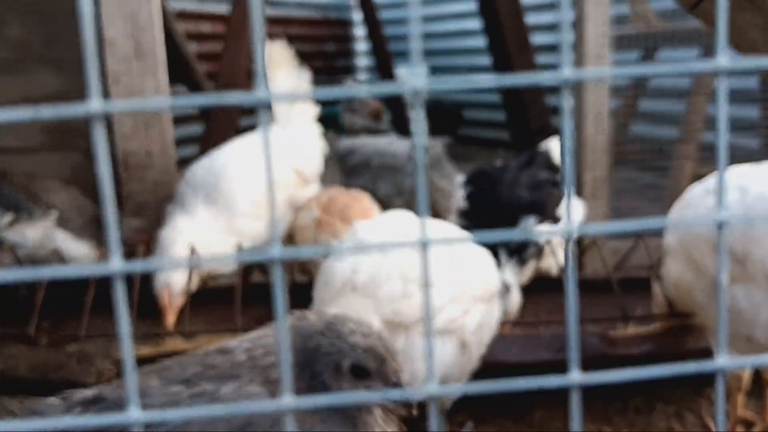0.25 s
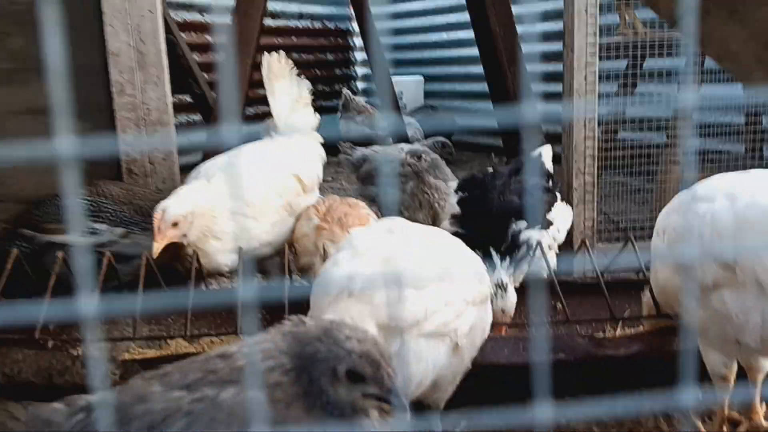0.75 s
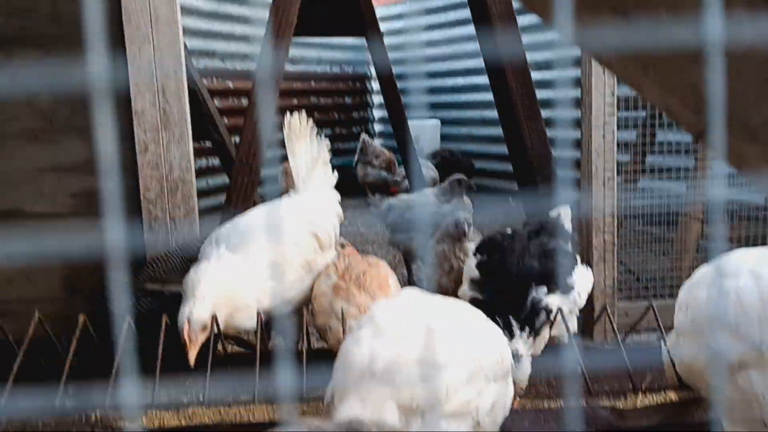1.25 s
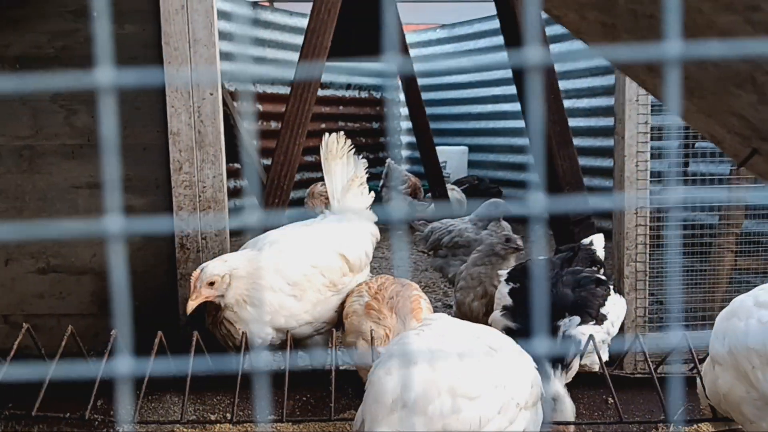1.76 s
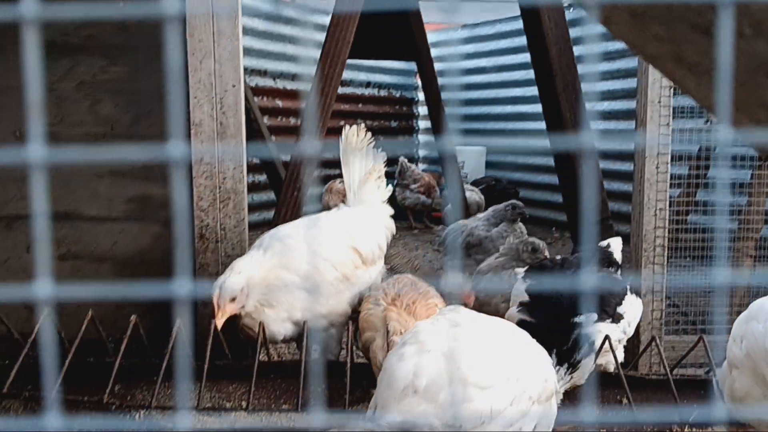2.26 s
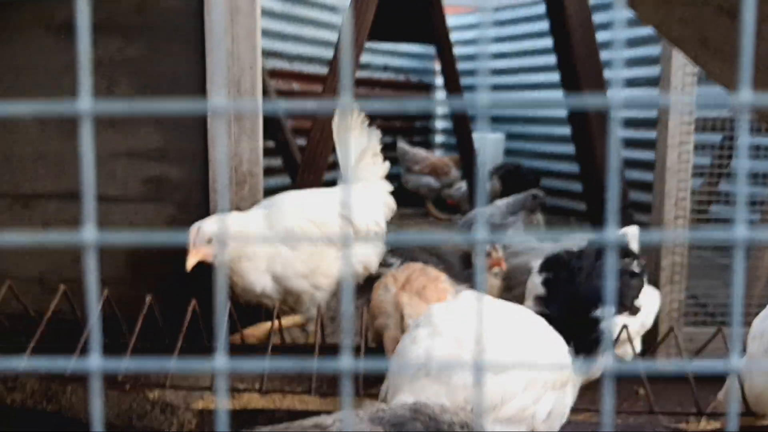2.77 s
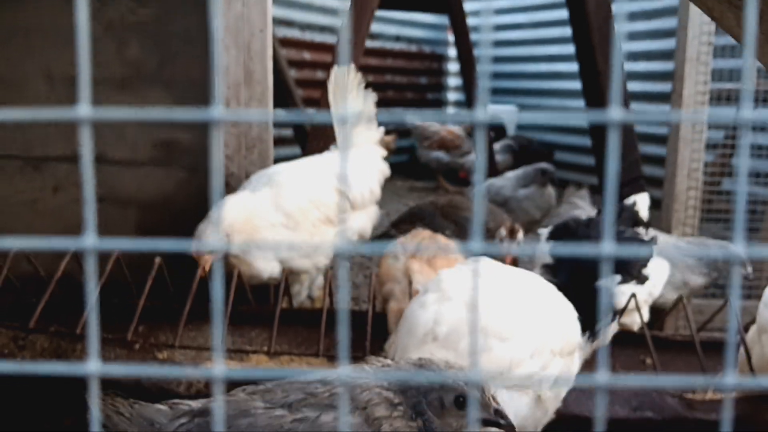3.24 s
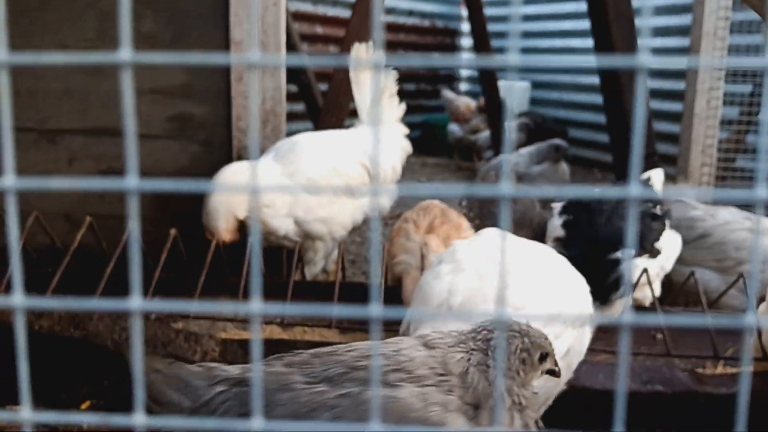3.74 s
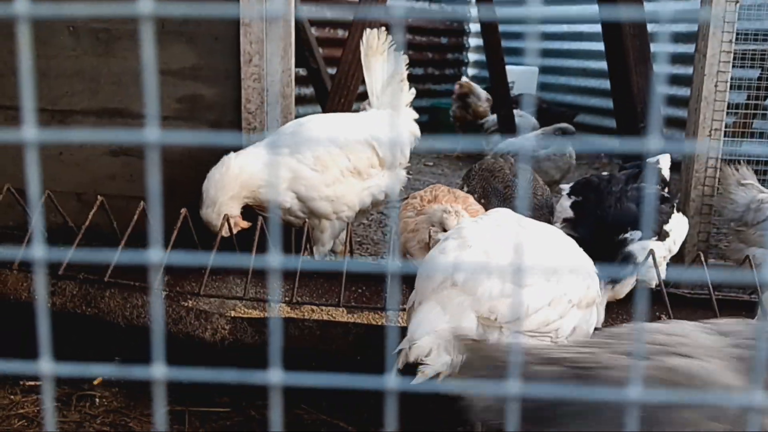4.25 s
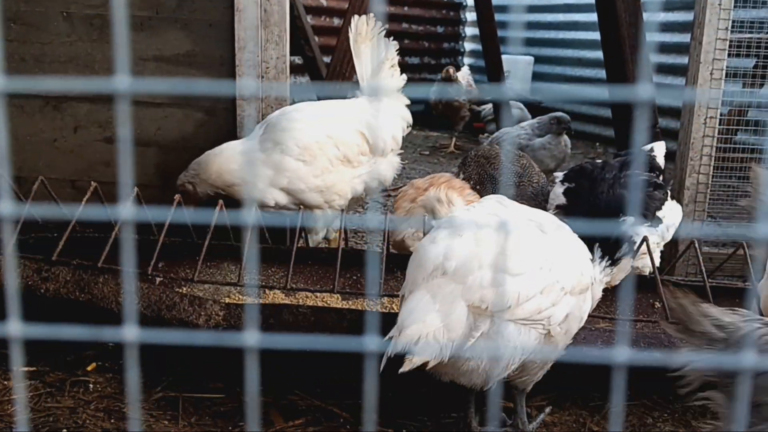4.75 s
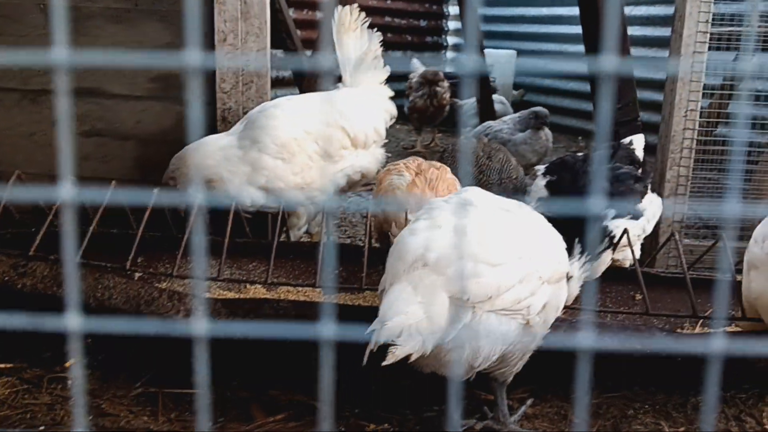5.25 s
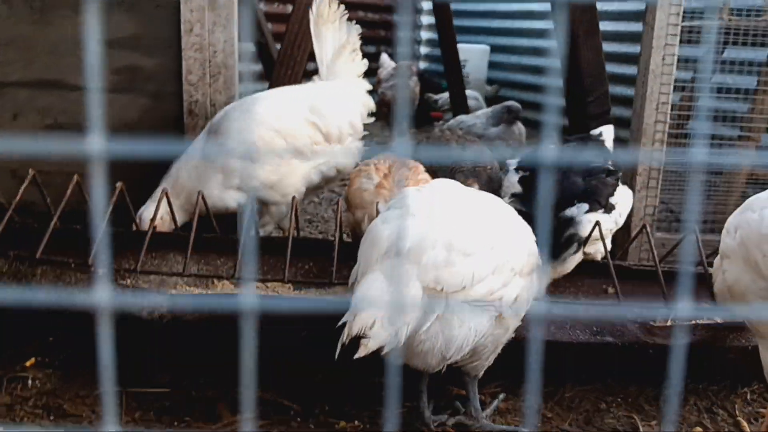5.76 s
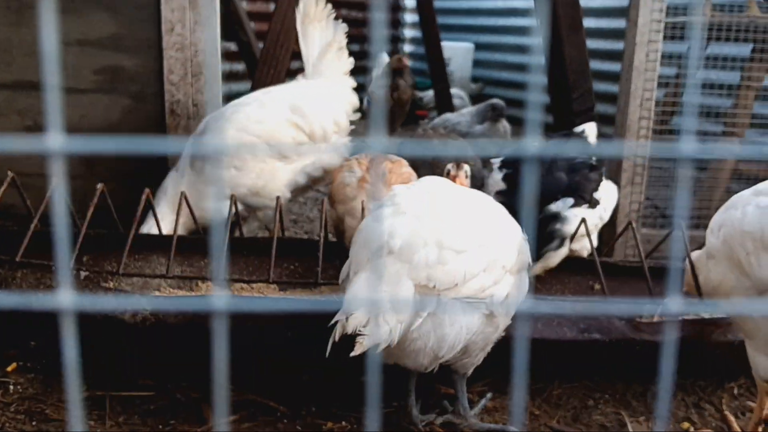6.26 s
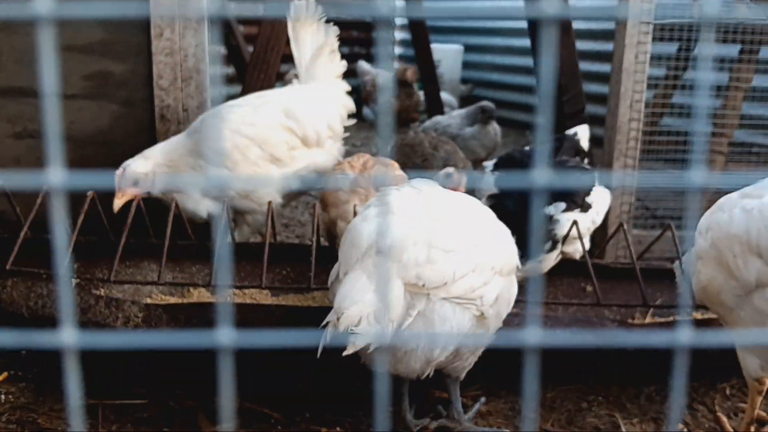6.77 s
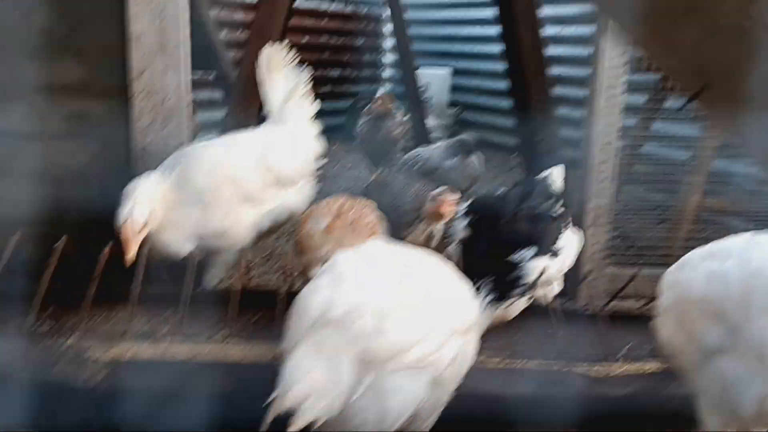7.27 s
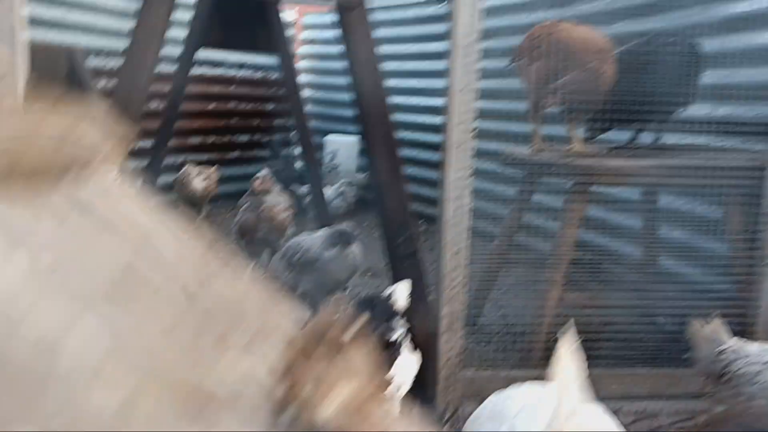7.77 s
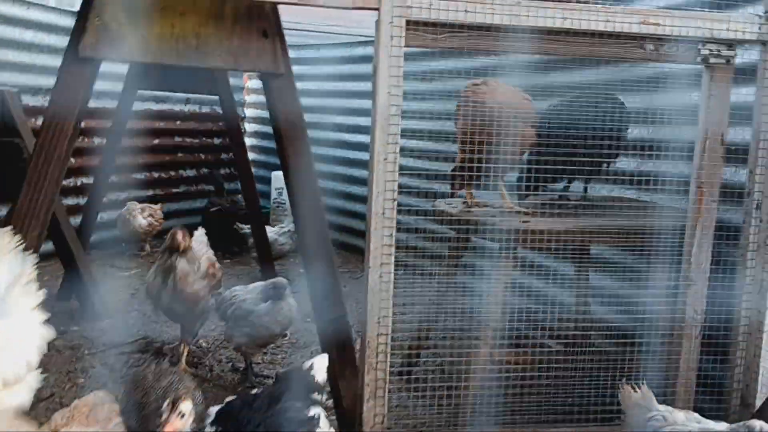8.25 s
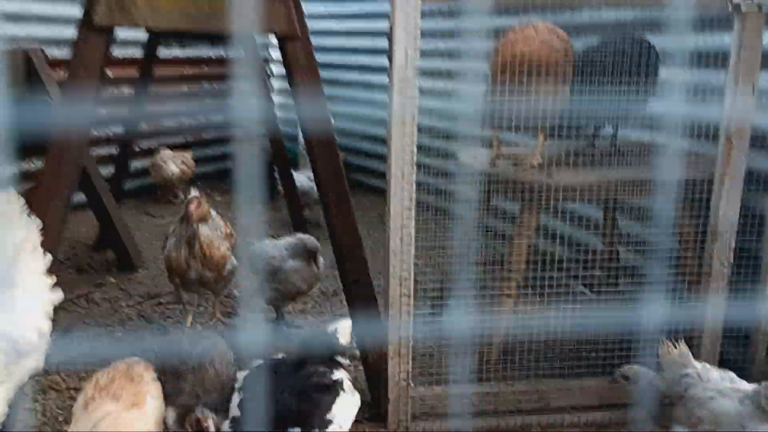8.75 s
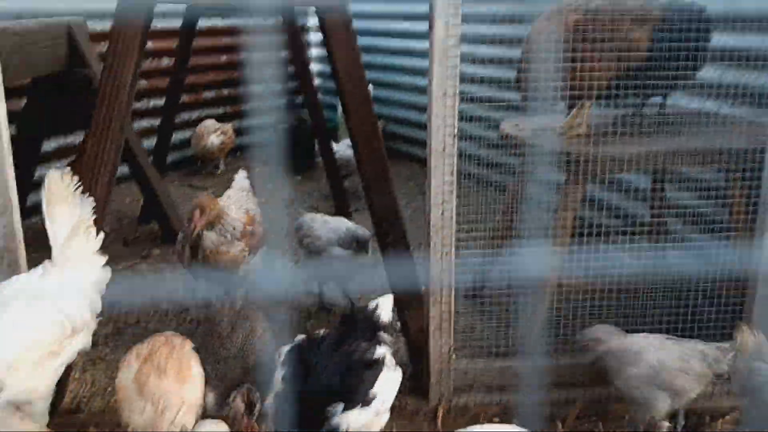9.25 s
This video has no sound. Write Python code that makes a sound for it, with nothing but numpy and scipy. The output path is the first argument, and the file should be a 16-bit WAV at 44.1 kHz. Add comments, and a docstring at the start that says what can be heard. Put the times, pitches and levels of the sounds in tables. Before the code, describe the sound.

Young hens peep and cluck in short, scattered notes throughout, close by in an outdoor run whose metal walls add a brief echo. A faint low rumble, hiss and distant engine drone lie beneath, with occasional soft rustles of feathers and straw. Two sparrows chirp on and off, clearest at about 2, 3 and 5.7 seconds. A quick run of raspy notes comes around 3.5 seconds. From 4 seconds, beaks tick lightly in grain, with knocks on the trough just after 5 seconds and again near 8.3. One hen gives a short, rough croak at about 5.5 seconds. Light wind starts touching the microphone near 6 seconds, then buffets it, mostly on the left, with low thumps between 7.5 and 8 seconds, the loudest moment. Peeps, clucks and further gusts continue until about 9.5 seconds.

```python
"""In a run of wire and corrugated sheet, young hens feed at a trough. The syrinx gives their peeps and
clucks, pulses in a resonant throat a croak. Beaks and feet ring the trough's modes, tick in the grain
and stir the straw; short raspy notes chatter. Two sparrows chirp nearby; the sheet walls reverberate.
Wind buffets the two microphone ports; a far rumble, an engine drone and a hiss lie below."""
import sys
import numpy as np
from scipy import signal
from scipy.fft import rfft, irfft
from scipy.io import wavfile

SR = 44100
rng = np.random.default_rng(int(sys.argv[2]) if len(sys.argv) > 2 else 0)


def pcm_store(signal):
    """Save signal as 16-bit PCM."""
    levels = np.round(np.clip(np.atleast_2d(signal), -1, 1) * 32767)
    wavfile.write(sys.argv[1], SR, levels.astype(np.int16).T)


N = 419391
LEFT_LAG_MS = .92   # mean delay of the left port behind the right


def amp(db):
    return 10 ** (np.asarray(db, float) / 20)


def unit_rms(x):
    return x / np.sqrt(np.mean(x ** 2, axis=-1, keepdims=True) + 1e-20)


def band(x, low_hz, high_hz, order=2):
    sos = signal.butter(order, [low_hz, min(high_hz, 19000)], "band", fs=SR, output="sos")
    return signal.sosfilt(sos, x)


def curves(rows):
    """Linear interpolation: each column after the time becomes one value a sample."""
    times, *columns = np.transpose(rows)
    return [np.interp(np.arange(N) / SR, times, column) for column in columns]


def coloured(x, points):
    """Spectral shaping by (Hz, dB) points, scaled to unit rms."""
    hz, level_db = np.transpose(points)
    bin_hz = np.maximum(np.arange(N // 2 + 1) * SR / N, 1)
    gain = amp(np.interp(np.log(bin_hz), np.log(hz), level_db))
    return unit_rms(irfft(rfft(x) * gain, N))


def wobble(size, per_s):
    """Random modulation: Gaussian points joined by lines."""
    points = rng.standard_normal(size // 20 + 3)
    return np.interp(np.arange(size) * min(per_s, 2000) / SR, np.arange(len(points)), points)


def swell(size, skew):
    """A rounded envelope; a skew below 1 makes the attack faster than the decay."""
    return np.sin(np.pi * np.linspace(0, 1, size) ** skew) ** 0.67


def grains(size):
    """A random impulse process: dense clicks of uneven size, in clumps."""
    clicks = rng.standard_normal(size) * amp(1.5 * np.minimum(rng.exponential(1, size), 5))
    return clicks * (rng.random(size) < .15) * amp(8.4 * wobble(size, 64))


def place(bus, start, x, pan_db, echo_db):
    """Level and time differences give direction. Pan is left minus right; rows are left, right, echo."""
    lag_s = (LEFT_LAG_MS + .2 * rng.standard_normal()) / 1000
    for row, delay, gain_db in ((0, lag_s, min(pan_db, 0)), (1, 0, -max(pan_db, 0)), (2, 0, echo_db)):
        at = round((start + delay) * SR)
        bus[row, at:at + len(x)] += amp(gain_db) * x[:N - at]


def ambience():
    """Far rumble and hiss, weakly coherent between the ports; the flock's stirring flickers on top."""
    # The background spectrum. Each row: frequency in Hz, relative density in dB.
    spectrum = [(18, -102), (30, -8.5), (59, 0), (88, -1), (467, -19.5), (921, -24.5), (3230, -28),
                (5040, -30.5), (10200, -32), (11900, -40), (15500, -42.5)]
    coherence = 0.05
    noise = coloured(rng.standard_normal((3, N)), spectrum)
    common = np.array([np.roll(noise[0], round(LEFT_LAG_MS * SR / 1000)), noise[0]])
    bed = np.sqrt(coherence) * common + np.sqrt(1 - coherence) * noise[1:]
    flicker = amp(-77.5 + 5.7 * wobble(N, 21))
    stirring = unit_rms(band(np.array([grains(N), grains(N)]), 7150, 8710))
    return amp(-63) * bed + flicker * stirring * amp([[0], [-6]])


def whine():
    """Random frequency modulation widens a thin, slowly sagging tone, mostly at the right port."""
    sag_hz_per_s, width_hz = 7.5, 18
    hz = 10385 - sag_hz_per_s * np.arange(N) / SR + width_hz * (wobble(N, 68) + wobble(N, 1.5))
    tone = np.sin(np.cumsum(hz) * 2 * np.pi / SR)
    return tone * amp(-76 + 3.5 * wobble(N, 30)) * amp([[-24], [0]])


def engine_drone():
    """Narrow-band noise: a far engine swells and fades, alike at both ports."""
    # The drone's envelope. Each row: time in seconds, level in dB.
    envelope = [(0.0, -83), (0.12, -59.5), (0.51, -74), (0.62, -50), (0.89, -81), (1.57, -89),
                (1.58, -63.5), (3.85, -77.5), (4.74, -53), (4.9, -69), (5.74, -62), (6.4, -87)]
    centre_hz, half_width_hz = 75.7, 6.2
    db, = curves(envelope)
    hum = band(rng.standard_normal(N), centre_hz - half_width_hz, centre_hz + half_width_hz)
    return amp(db) * unit_rms(hum)


def wind():
    """Turbulence gives each port its own low noise: unsteady when light, brighter in strong gusts."""
    # Wind on the ports. Each row: time in seconds, level in dB, pan in dB.
    gusts = [(0.0, -66.5, 14), (2.19, -80.5, 3), (3.33, -76, 2), (4.81, -68, 7), (5.37, -63, 12),
             (5.58, -67, -14), (5.66, -46, 36), (5.74, -75, 7), (5.87, -49, 20.0), (5.95, -68, 4),
             (6.48, -74, -2), (6.54, -47, 15), (6.72, -45.5, 35), (6.8, -58.5, 1), (6.88, -52.5, 2.5),
             (7.41, -45, 19), (7.49, -37, 3), (7.54, -52, 3), (7.59, -35.5, 32), (7.64, -31, 28),
             (7.75, -39, 12), (7.88, -33.5, 39), (8.04, -42.5, 22.5), (8.07, -34, 41), (8.15, -43.5, -16),
             (8.23, -49.5, -32), (8.39, -40.5, 5), (8.44, -48, -20), (8.89, -60.5, -6), (9.13, -35.5, 22),
             (9.18, -53, 18), (9.23, -41.5, 36), (9.31, -56.5, 23), (9.39, -35.5, 42.5), (9.45, -48.5, 25),
             (9.5, -41.5, 33)]
    bright_gust_db = -29.5
    db, pan_db = curves(gusts)
    port_level = amp(db) * 2 / np.sqrt(1 + amp(2 * np.array([-pan_db, pan_db])))
    lightness = np.clip((-48 - db) / 12, 0, 1)
    lumps_db = [7.7 * lightness * wobble(N, 5.6) + 1.9 * wobble(N, 22) for side in range(2)]
    low = coloured(rng.standard_normal((2, N)),
                   [(12, 1.0), (30, -2), (60, 4.0), (110, -6.0), (200, -27.5), (400, -65.5)])
    high = coloured(rng.standard_normal((2, N)),
                    [(40, -0.5), (110, 10.5), (170, 4.5), (300, -19.5), (500, -46), (900, -99)])
    brightness = 0.67 * np.clip(port_level / amp(bright_gust_db), 0, 1.3) ** 2
    return port_level * amp(lumps_db) * (low + brightness * high)


def wind_pops():
    """Damped oscillation: a push of wind sends the left membrane through a few dying swings."""
    # Pushes on the membrane. Each row: start in seconds, level in dB, swing frequency in Hz.
    pushes = [(7.565, -20.5, 84), (7.609, -15.5, 94.4), (7.6702, -13.5, 156), (7.892, -15.5, 54)]
    bus, t = np.zeros((2, N)), np.arange(SR // 10) / SR
    for start, db, hz in pushes:
        envelope = 7 * hz * t * np.exp(-2.5 * hz * t)
        bus[0, round(start * SR):][:len(t)] += amp(db) * envelope * np.sin(2 * np.pi * hz * t)
    return bus


def wall_echoes(x):
    """Reverberation: the sheet walls return strong early reflections and a tail, unlike at each port."""
    tail_t60_s, early_t60_s = 0.41, 0.15
    t = np.arange(SR // 2) / SR
    decay = amp(-60 * t / tail_t60_s) + 3.6 * amp(-60 * t / early_t60_s)
    response = rng.standard_normal((2, len(t))) * decay * np.minimum(t / 0.0088, 1)
    response /= np.sqrt(np.sum(response ** 2, axis=1, keepdims=True))
    return signal.fftconvolve(x[None], response, axes=1)[:, :N]


def syrinx(hz, level, overtones_db, rasp, waver):
    """Harmonic oscillation under random modulation: pitch wavers, level flutters, breath roughens it."""
    size = len(hz)
    phase = np.cumsum(hz * (1 + waver * wobble(size, 155))) * 2 * np.pi / SR
    tone = np.sin(phase) + sum(amp(db) * np.sin(k * phase) for k, db in enumerate(overtones_db, 2))
    flutter = amp(3.1 * wobble(size, 163))
    roughness = 1 + rasp * wobble(size, 900)
    return tone * level * flutter * roughness


def harsh_voice(hz, level, second_db):
    """Deep amplitude modulation makes a syrinx tone with two overtones raspy."""
    return syrinx(hz, level, [second_db, second_db - 20], rasp=.5, waver=.022)


def chirp(syllables, second_db, pitch_factor):
    """Frequency sweeps: each syllable leaps up and slides down, with breath noise in the treble."""
    slide_curl = 2.2   # above 1 the slide starts steep and flattens
    out = np.zeros(SR // 6)
    for start, rise, fall, start_hz, top_hz, end_hz, db in syllables:
        leap = np.linspace(start_hz, top_hz, round(rise * SR))
        slide = end_hz + (top_hz - end_hz) * np.linspace(1, 0, round(fall * SR)) ** slide_curl
        hz = pitch_factor * np.r_[leap, slide]
        level = amp(db) * swell(len(hz), 1.1)
        breath = unit_rms(band(rng.standard_normal(len(hz)), 4600, 11500, order=4))
        syllable = harsh_voice(hz, level, second_db) + amp(second_db - 9) * level * breath
        out[round(start * SR):][:len(hz)] += syllable
    return out


def sparrows():
    """Transposition: each of two birds repeats its own chirp at slightly varying pitch."""
    # Each bird's syllables. Each row: offset, rise and fall in seconds, start, top and end pitch
    # in Hz before transposition, relative level in dB.
    short_chirp = [(0, .018, .023, 3720, 4600, 3156, 9), (.047, .018, 0.0196, 3097, 3976, 2984, 6.5)]
    long_chirp = [(0, .012, .058, 2878, 4550, 2950, 3.1), (.034, .008, 0.022, 4260, 4490, 4427, 0.44),
                  (.086, 0.0168, .005, 2725, 3567, 3000, 3.8)]
    # Each bird's calls. Each row: start in seconds, level in dB, pitch factor, then second harmonic,
    # pan and echo in dB.
    short_calls = [(0.031, -52.5, 1.02, -22.5, 24, -2.5), (0.759, -79, 0.97, -22, 6, 13),
                   (1.005, -54, 1.005, -23, 10, -4.5), (3.724, -56.5, 0.98, -26.5, 19, 5.5),
                   (4.089, -63, 0.95, -41, 20, 4.5), (4.531, -55, 1.04, -27, 11, 0.5),
                   (5.327, -52.5, 1, -31, -19, 0.5), (6.25, -42.5, 1.01, -26.5, 20, -5),
                   (7.034, -52.5, 1.02, -31, 10, -2.5), (8.066, -47, 1.063, -17.5, 16, -6.5),
                   (9.0, -53, 0.97, -24, 4, 1)]
    long_calls = [(1.876, -40.5, 0.94, -4.5, -19, -10), (2.805, -56, 1.02, -23, 2, 10),
                  (3.003, -35, 1.0, -9, -2, -3.5), (5.711, -38.5, 1.018, -14, 10, -12)]
    bus = np.zeros((3, N))
    for syllables, calls in ((short_chirp, short_calls), (long_chirp, long_calls)):
        for start, db, pitch_factor, second_db, pan_db, echo_db in calls:
            place(bus, start, amp(db) * chirp(syllables, second_db, pitch_factor), pan_db, echo_db)
    return bus


def patchy_noise(low_hz, high_hz, size):
    """Independent modulation: grains ring in five bands that come and go on their own."""
    edges = np.geomspace(low_hz, high_hz, num=6)
    return unit_rms(sum(unit_rms(band(grains(size), low, high)) * amp(7 * wobble(size, 40))
                        for low, high in zip(edges, edges[1:])))


def rustles():
    """Granular noise swells and fades as feathers, straw and grain are stirred."""
    # The stirrings. Each row: start and length in seconds, level in dB, band edges in Hz, pan in dB.
    stirrings = [(0.274, 0.063, -57, 2860, 5300, 6), (0.955, 0.16, -56.5, 1020, 10500, 2),
                 (1.779, 0.054, -50.5, 1120, 3770, 0), (1.828, 0.22, -54, 3070, 8850, 1),
                 (2.215, 0.14, -49.5, 2800, 5800, 10), (2.618, 0.16, -63.5, 2640, 3700, 4),
                 (2.807, 0.052, -44, 1330, 2690, -4), (3.671, 0.054, -47.5, 2480, 6300, 4),
                 (5.579, 0.037, -55, 6000, 9500, 12), (6.076, 0.21, -65, 1490, 3920, 6),
                 (6.214, 0.061, -54.5, 4280, 7360, 23), (6.264, 0.48, -66, 656, 2870, 36),
                 (6.355, 0.043, -59, 6360, 12900, 16), (6.437, 0.064, -48.5, 4460, 11000, 25),
                 (6.678, 0.056, -59, 607, 2210, 11), (6.99, 0.073, -58.5, 3770, 7360, 7),
                 (7.181, 0.035, -52, 1520, 2560, 1), (7.241, 0.35, -69.5, 900, 3000, 6),
                 (7.543, 0.24, -59, 6500, 9600, 24), (7.839, 0.037, -54.5, 6500, 10300, 8),
                 (7.871, 0.014, -47, 1420, 2320, 0), (8.042, 0.22, -52, 790, 9800, 27),
                 (8.272, 0.079, -47, 1550, 12300, 5), (8.621, 0.071, -59.5, 1060, 6600, 2)]
    bus = np.zeros((3, N))
    for start, length, db, low_hz, high_hz, pan_db in stirrings:
        size = round(length * SR)
        rustle = swell(size, 0.84) * patchy_noise(low_hz, high_hz, size)
        place(bus, start, amp(db) * rustle, pan_db, echo_db=-8)
    return bus


def raspy_chatter():
    """A quick run of short raspy notes, each a narrow-band whistle over broadband noise."""
    # The notes. Each row: start in seconds, level in dB, whistle pitch in Hz.
    notes = [(3.277, -55.5, 4050), (3.311, -54, 4340), (3.351, -48, 4130), (3.404, -43.5, 3850),
             (3.459, -53.5, 3130), (3.509, -56, 2650), (3.559, -51, 3620), (3.617, -47, 3620)]
    bus, size = np.zeros((3, N)), SR // 24
    for start, db, hz in notes:
        whistle = unit_rms(band(grains(size), 0.92 * hz, 1.083 * hz))
        note = whistle + 0.32 * patchy_noise(1560, 6440, size)
        place(bus, start, amp(db) * swell(size, 0.4) * note, pan_db=8, echo_db=-12)
    return bus


def grain_ticks():
    """A short contact has a wide spectrum: a sharp crack, then bright grains that die fast."""
    # Pecks and claws in the grain. Each row: start in seconds, level in dB, the grains' T60 in seconds,
    # pan in dB, lower band edge in Hz.
    contacts = [(3.201, -47, 0.13, -1, 3000), (4.1978, -56, 0.21, 0, 3460), (4.4754, -47.5, 0.14, 3, 3360),
                (4.6675, -51.5, 0.041, 1, 2960), (4.838, -44, 0.041, 2, 5950),
                (4.9368, -41.5, 0.032, -6, 1230), (5.13, -49.5, 0.045, 0, 2000),
                (5.1861, -47, 0.12, 11, 2000), (5.233, -43.5, 0.17, 0.5, 1940),
                (5.985, -54.5, .05, -1, 8800), (6.071, -45, 0.069, 12, 7360), (6.092, -41, 0.033, 16, 7260),
                (6.138, -43, 0.17, 8.5, 4400), (6.1757, -44.5, 0.054, 8, 5800),
                (6.4372, -51, 0.097, 11, 6060), (6.504, -46, 0.064, 15, 8850),
                (6.5588, -49, 0.073, 20, 6200), (6.858, -58, 0.11, 5, 3850), (7.372, -50, 0.069, 5, 6460),
                (8.233, -56.5, 0.14, 17, 3030), (9.386, -52.5, 0.083, -8, 8640)]
    crack_db, crack_t60_s = -7, .02
    bus, t = np.zeros((3, N)), np.arange(SR // 5) / SR
    for start, db, t60, pan_db, low_hz in contacts:
        clicks = .6 * unit_rms(grains(len(t))) + rng.standard_normal(len(t))
        crack = amp(crack_db - 60 * t / crack_t60_s) * unit_rms(band(clicks, low_hz, 19000, order=4))
        spill = unit_rms(band(clicks, low_hz, max(8500, 1.35 * low_hz), order=4))
        spill *= amp(-60 * t / t60) * np.minimum(t / 0.002, 1)
        place(bus, start, amp(db) * (crack + spill), pan_db, echo_db=-30)
    return bus


def trough_knocks():
    """Modal ringing: a blow and its rattle excite damped modes that vary with where it lands."""
    # The trough's modes. Each row: frequency in Hz, relative level in dB, T60 in seconds.
    modes = [(411, 12, 0.023), (509, 17, 0.027), (633, 12, 0.021), (860, 12, 0.014), (1150, 6.5, 0.014),
             (1550, 7.5, 0.014), (2070, -2, 0.021)]
    # Beaks and feet on trough and boards. Each row: start in seconds, level and pan in dB,
    # the rattle's time scale in seconds.
    blows = [(0.46, -67, -2, 0.043), (4.215, -55, 0.5, 0.066), (4.671, -64, 3.5, 0.075),
             (4.747, -58.5, 11, 0.03), (5.126, -45.5, 2, 0.065), (5.232, -36.5, -0.5, 0.028),
             (6.691, -62, 2, 0.055), (7.379, -62.5, -3, 0.026), (7.842, -60, 1.5, 0.03),
             (8.071, -62, -10, 0.13), (8.264, -35, 13, 0.004), (8.274, -48.5, 1.5, 0.07),
             (8.318, -39.5, 2, 0.03), (8.475, -60, -17, 0.018), (8.633, -50, -43, 0.0065)]
    bounces_per_s = 1500
    bus, t, rattle_t = np.zeros((3, N)), np.arange(SR // 10) / SR, np.arange(SR // 5) / SR
    hz, mode_db, t60 = np.transpose(modes)[:, :, None]
    for start, db, pan_db, rattle_s in blows:
        level_scatter, pitch_scatter = rng.standard_normal((2, *hz.shape))
        envelopes = amp(mode_db + 1.5 * level_scatter - 60 * t / t60) * np.minimum(t / 0.0016, 1)
        ring = np.sum(envelopes * np.sin(2 * np.pi * hz * (1 + 0.074 * pitch_scatter) * t), axis=0)
        force = rng.standard_normal(len(rattle_t)) * (rng.random(len(rattle_t)) < bounces_per_s / SR)
        force *= 0.32 * np.clip(1.3 - rattle_t / rattle_s, 0, 1)
        force[0] = 1   # the blow itself
        knock = band(signal.fftconvolve(force, ring), 312, 8000, order=4)
        place(bus, start, amp(db) * knock, pan_db, echo_db=-22)
    return bus


def hen_croak():
    """Source and formant: uneven pulses modulate a tone at the moving throat resonance, amid breath."""
    # The croak's course. Each row: time in seconds, throat resonance in Hz, level in dB.
    course = [(5.389, 2100, -71), (5.454, 1598, -46), (5.559, 1566, -49.5), (5.599, 1317, -48.5),
              (5.72, 1333, -46.5), (5.747, 1367, -40), (5.774, 1290, -57.5), (5.83, 1296, -93)]
    pulse_hz, start, end = 390, course[0][0], course[-1][0]
    throat_hz, db = (curve[round(start * SR):round(end * SR)] for curve in curves(course))
    bus, size = np.zeros((3, N)), len(db)
    cycles = np.cumsum(pulse_hz * (1 + .15 * wobble(size, 60))) / SR
    ringing = np.sin(np.cumsum(throat_hz * (1 + .04 * wobble(size, 60))) * 2 * np.pi / SR)
    pulses = np.exp(-1.8 * (cycles % 1)) * amp(4.5 * wobble(size, 70))
    breath = unit_rms(band(rng.standard_normal(size), 950, 2200))
    croak = band(unit_rms(pulses * ringing) + .8 * breath, 750, 2250, order=4)
    place(bus, start, amp(db) * croak, pan_db=4, echo_db=-12)
    return bus


def hen_warble():
    """Coupled frequency and amplitude modulation: a squeak swings fast in pitch, louder when low."""
    start, length, first_top_s = 1.058, .068, 0.0205
    centre_hz, swing_hz, swings_per_s = 1960, 727, 37
    bus, t = np.zeros((3, N)), np.arange(round(length * SR)) / SR
    swing = np.cos(2 * np.pi * swings_per_s * (t - first_top_s))
    level = amp(-54 - 1.5 * swing) * swell(len(t), 0.88)
    squeak = harsh_voice(centre_hz + swing_hz * swing, level, second_db=-15)
    place(bus, start, squeak, pan_db=3, echo_db=-5.5)
    return bus


def hen_clucks():
    """A rough harmonic series of four partials glides straight in pitch."""
    # The clucks. Each row: start and length in seconds, start and end pitch in Hz, then level,
    # second harmonic and pan in dB.
    clucks = [(0.993, 0.052, 398, 424, -46, 3.5, -3), (1.791, 0.021, 1936, 1680, -39, -30, 13),
              (1.5, 0.046, 516, 625, -51.5, -13.5, 4), (2.492, 0.051, 1418, 1370, -49.5, -25, -1),
              (2.602, 0.031, 930, 766, -59, -22, 8), (2.836, 0.031, 887, 847, -47, 3, 6),
              (2.829, 0.042, 1442, 1374, -39.5, -10, -5), (3.194, 0.03, 750, 860, -58.5, -4, -1),
              (6.298, 0.05, 924, 1046, -57, -7, 18), (6.449, 0.037, 2040, 2080, -50, -23, 6),
              (6.369, 0.056, 753, 754, -56.5, -26, 3), (6.53, 0.034, 1630, 1690, -55, -10, 16),
              (6.567, 0.022, 590, 560, -51, -13, 14), (6.884, 0.035, 811, 883, -50.5, -15, 1),
              (7.193, 0.03, 1186, 1183, -49, 7, 5.0), (7.85, 0.043, 1376, 1407, -30.5, -45, 12.5),
              (8.194, 0.074, 1230, 2070, -48, -30, 25), (8.683, 0.033, 815, 777, -51.5, -14, -6),
              (9.168, 0.039, 814, 780, -51, 3.5, 9)]
    bus = np.zeros((3, N))
    for start, length, start_hz, end_hz, db, second_db, pan_db in clucks:
        hz = np.linspace(start_hz, end_hz, round(length * SR))
        overtones_db = [second_db, second_db - 13, second_db - 15]
        cluck = syrinx(hz, amp(db) * swell(len(hz), 0.8), overtones_db, rasp=.35, waver=.04)
        place(bus, start, cluck, pan_db, echo_db=-16)
    return bus


def hen_peeps():
    """A high fundamental and its octave glide along a slight arch."""
    # The peeps. Each row: start and length in seconds, the glide's start and end in Hz, arch above
    # the glide in percent, then level, second harmonic and pan in dB.
    peeps = [(.246, 0.03, 1910, 1950, -1, -51, -23, -5), (0.283, 0.035, 1876, 1910, 0, -55, -16, 1),
             (.355, 0.062, 2320, 1790, -6.5, -36, -43, -4), (0.516, 0.093, 2600, 1798, 4.5, -39, -31, 0.5),
             (0.529, 0.052, 3150, 2450, -1, -45, -38, 2), (0.353, 0.05, 2860, 2140, 3, -54.5, -38, 1),
             (0.834, 0.058, 2840, 2820, -0.2, -56, -19, 22), (1.577, 0.062, 2900, 2760, 0.5, -56, -19, 5),
             (1.691, 0.033, 1990, 2190, 1, -55, -32, -5), (1.726, 0.083, 2785, 2500, 1, -44, -28, 7),
             (1.731, 0.064, 3150, 2790, 2, -51.5, -36, 1), (1.787, 0.041, 2516, 2320, 6, -38, -49, 3),
             (1.832, 0.077, 2240, 2505, -3, -44, -28, 2.5), (2.52, 0.033, 1923, 2140, 5.5, -42, -34, -1),
             (2.791, 0.05, 2155, 2250, 4.5, -50, -7, 5), (2.848, 0.028, 2124, 2260, 8.5, -34.5, -17, -6.5),
             (3.193, 0.083, 2686, 2316, 3, -43, -13, 1), (3.668, 0.044, 2305, 2310, 5.5, -42.5, -9, 6),
             (3.884, .1, 3910, 2950, -1, -52, -13, 6), (4.054, 0.11, 3210, 2540, 9.5, -43, -46, 14),
             (4.295, 0.25, 3180, 3845, -1.5, -49, -26, 9), (4.591, 0.053, 2393, 2434, -2, -45, -16, -3),
             (4.771, 0.083, 3860, 3010, -1.5, -49, -15, 2), (5.188, 0.069, 2433, 2510, 1.5, -48, -10, 5),
             (5.567, 0.052, 3200, 3010, 6, -49, -15, 7), (5.946, 0.047, 2254, 2225, 1, -43, -9, 3),
             (6.382, 0.029, 3140, 3000, -1.5, -41.5, -24, 21),
             (6.504, 0.057, 3590, 3050, 4.5, -36, -11, 35), (6.725, 0.05, 3670, 2850, 11.5, -41.5, -18, 15),
             (7.948, 0.078, 2420, 2420, -8.5, -52.5, -34, 7), (8.341, 0.1, 2080, 1960, -4, -50.5, -38, 14),
             (8.413, 0.036, 1774, 1683, -2, -36, -42, -4.5), (8.441, 0.03, 1780, 2575, 10, -38, -31.5, 5),
             (8.562, 0.066, 2084, 2180, 7, -41.5, -10, 1), (8.735, 0.1, 3690, 2975, 2, -47, -14.5, -1.5),
             (8.891, 0.073, 4320, 3120, -0.5, -41, -20.5, -10),
             (9.354, 0.062, 2180, 2290, 9, -48.5, -8.5, 7)]
    bus = np.zeros((3, N))
    for start, length, start_hz, end_hz, arch, db, second_db, pan_db in peeps:
        along = np.linspace(0, 1, round(length * SR))
        glide_hz = np.interp(along, [.05, .85], [start_hz, end_hz])
        hz = glide_hz * (1 + arch / 100 * np.sin(np.pi * along))
        peep = syrinx(hz, amp(db) * swell(len(hz), .75), [second_db], rasp=.32, waver=.018)
        place(bus, start, peep, pan_db, echo_db=-16)
    return bus


def scene():
    """Superposition of the near sources, their reverberation, the wind and the background."""
    voices = hen_peeps() + hen_clucks() + hen_warble() + sparrows() + hen_croak()
    near = voices + trough_knocks() + grain_ticks() + rustles() + raspy_chatter()
    return near[:2] + wall_echoes(near[2]) + wind() + wind_pops() + engine_drone() + ambience() + whine()


def record(dry):
    """Band limiting: a steep low-pass filter cuts the top of the treble."""
    stopband_hz = 16300
    return signal.sosfilt(signal.cheby2(14, 50, stopband_hz, fs=SR, output="sos"), dry)


dry = scene()
out = record(dry)
pcm_store(out)
```